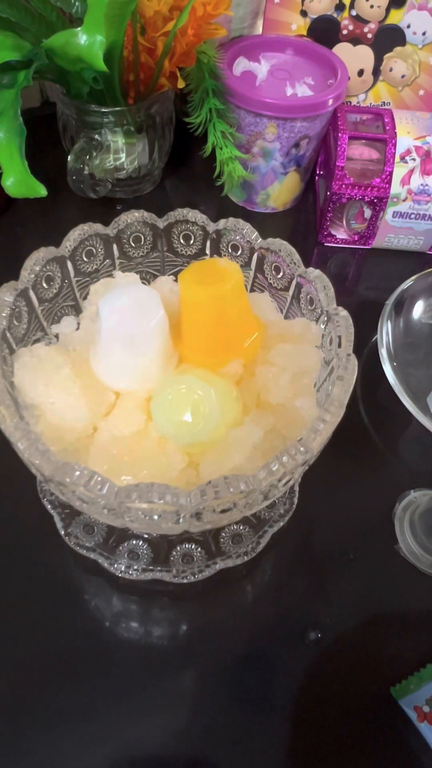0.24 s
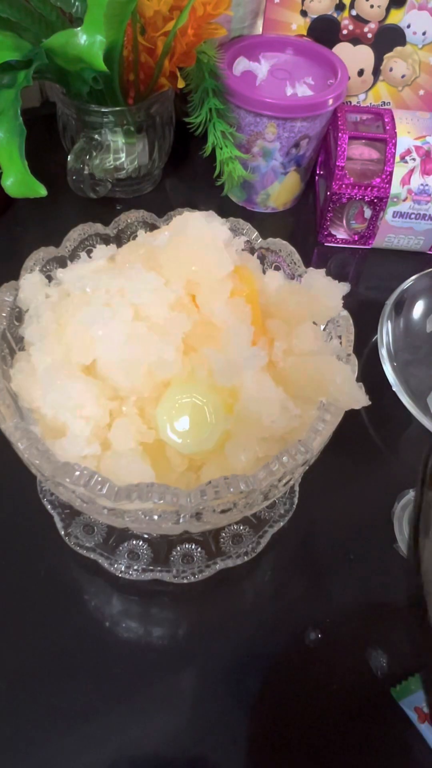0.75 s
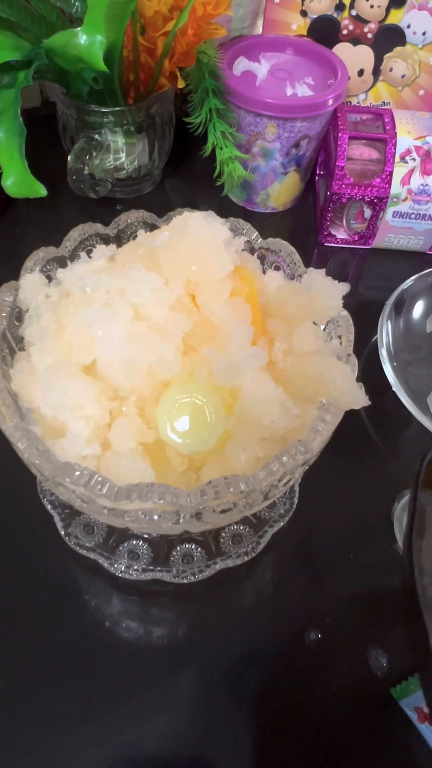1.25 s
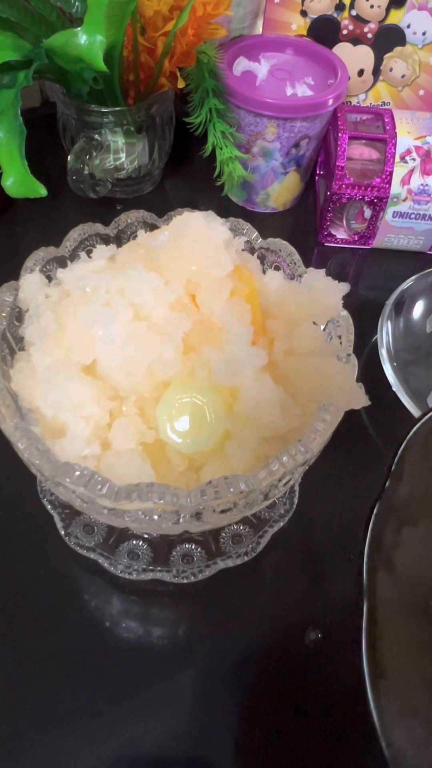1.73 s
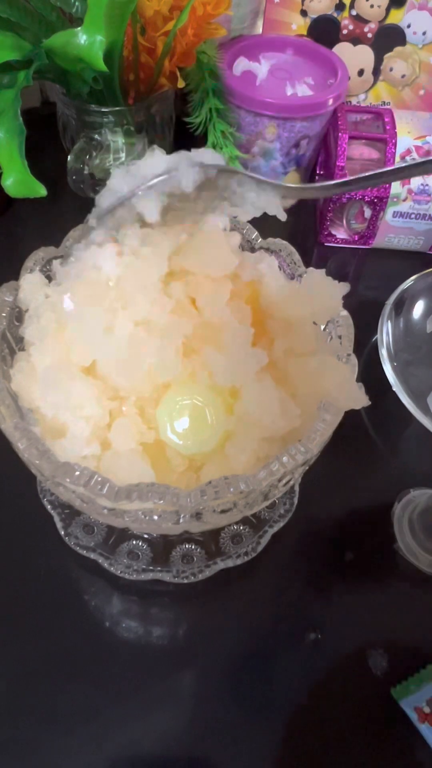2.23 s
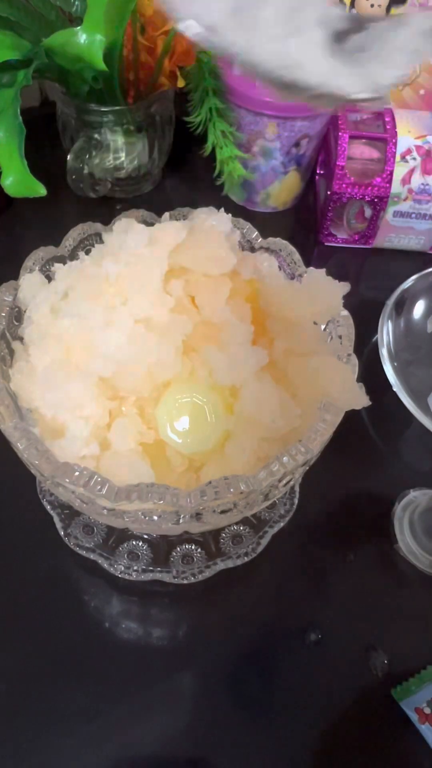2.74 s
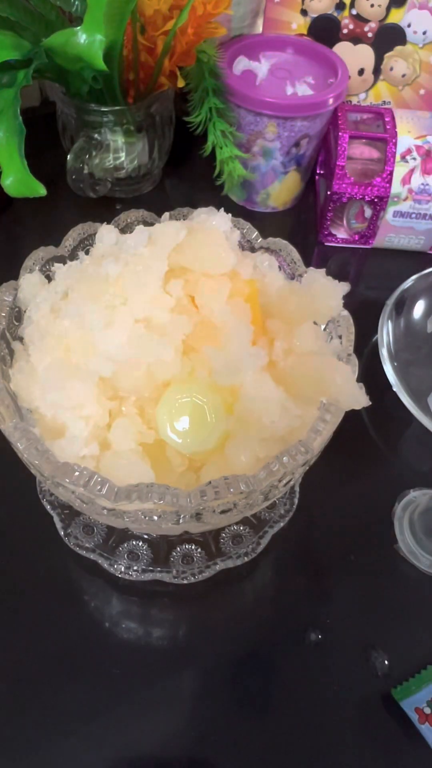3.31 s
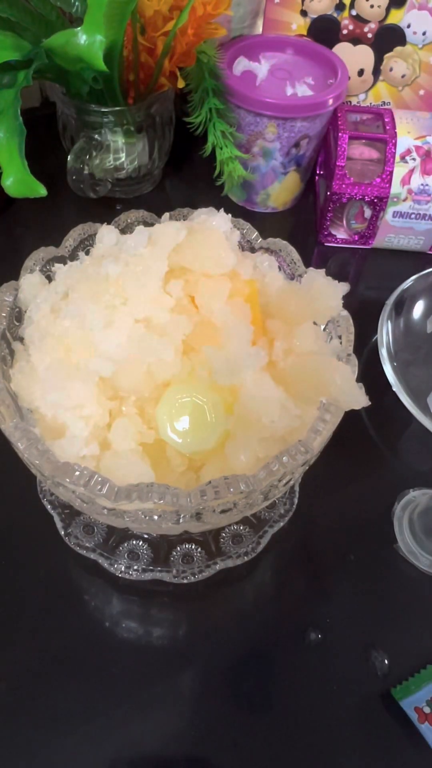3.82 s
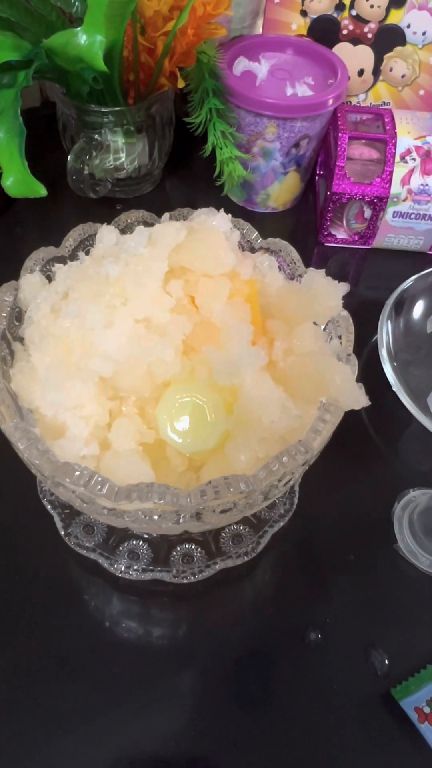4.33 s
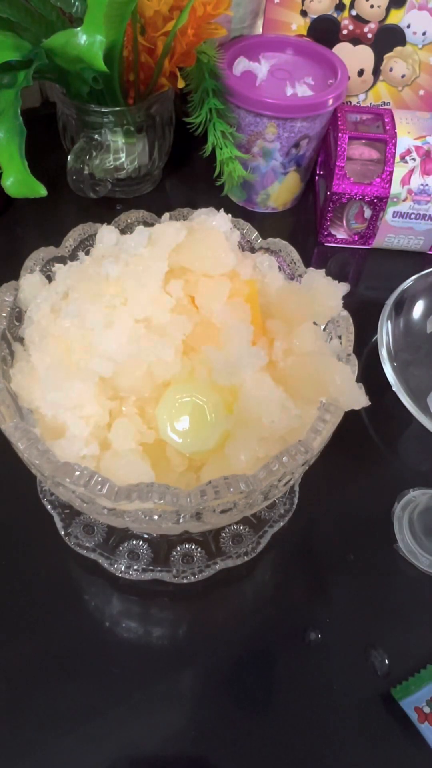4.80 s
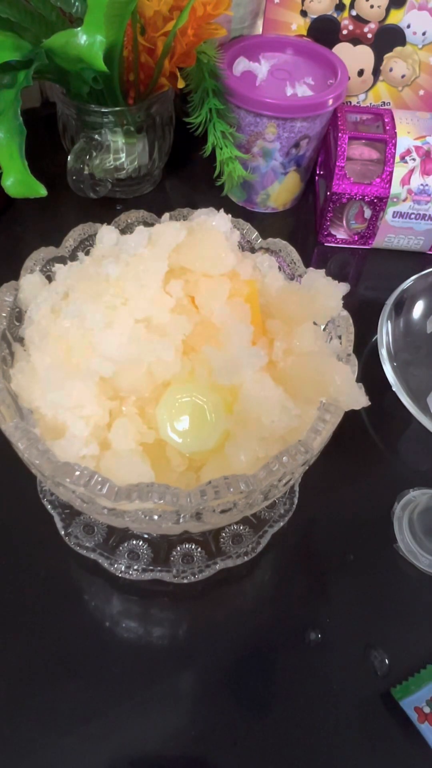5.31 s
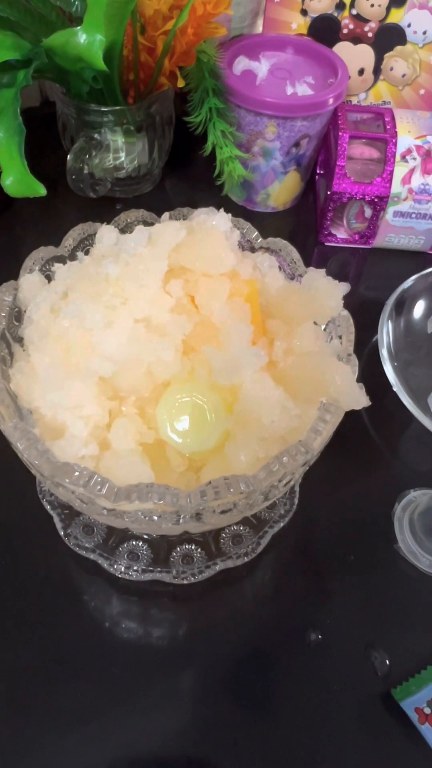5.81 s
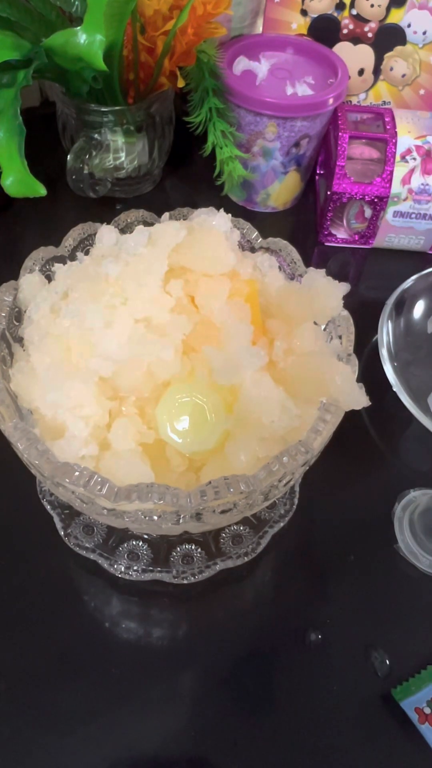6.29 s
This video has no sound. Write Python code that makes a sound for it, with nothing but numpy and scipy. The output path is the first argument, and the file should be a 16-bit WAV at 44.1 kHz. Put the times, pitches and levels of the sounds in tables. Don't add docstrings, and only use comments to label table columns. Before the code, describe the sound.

Close up in a small hard kitchen, ice gives brief bright crunches, a tiny gap, then a loud spoon bite with sharp cracks and glass clinks. Grains skitter and it goes quiet. Softer slushy slides and light metallic scrapes follow, then a plastic tub further off is knocked and thuds hollowly. A faint fridge hum and room air run underneath.

```python
import sys
import numpy as np
from scipy import signal
from scipy.fft import rfft, irfft, next_fast_len
from scipy.io import wavfile
from scipy.ndimage import uniform_filter1d

SR = 44100
rng = np.random.default_rng(int(sys.argv[2]) if len(sys.argv) > 2 else 0)


def field_ratio(decibels):
    return 10 ** (np.asarray(decibels, dtype=float) / 20)


def store_pcm(level_fs):
    pcm = np.round(np.clip(level_fs, -1, 1) * 32767).astype(np.int16)
    wavfile.write(sys.argv[1], SR, np.atleast_2d(pcm).T)


N = 288855
SCENE_CHANGE_S = 0.343


def rms_one(x):
    return x / np.sqrt(np.mean(x ** 2) + 1e-20)


def at_hz(points, hz):
    table_hz, values = np.transpose(points)
    return np.interp(np.log(hz), np.log(table_hz), values)


def band(x, low_hz, high_hz):
    return signal.sosfilt(signal.butter(2, [low_hz, high_hz], "band", fs=SR, output="sos"), x)


def high_pass(x, order, hz):
    return signal.sosfilt(signal.butter(order, hz, "high", fs=SR, output="sos"), x)


def drift(rate_hz):
    steps = rng.standard_normal(int(N / SR * 60) + 2)
    r = np.exp(-2 * np.pi * rate_hz / 60)
    wander = rms_one(signal.lfilter([1], [1, -r], steps))
    return np.interp(np.arange(N) * 60 / SR, np.arange(len(steps)), wander)


def ring(x, hz, t60_s):
    r, w = field_ratio(-60 / (t60_s * SR)), 2 * np.pi * hz / SR
    return signal.lfilter([0, np.sin(w)], [1, -2 * r * np.cos(w), r * r], x + 1e-18)


def spread(mid, side, alike):
    alike = np.clip(alike, -1, 1)
    return np.sqrt((1 + alike) / 2) * mid + np.sqrt((1 - alike) / 2) * side * [[1], [-1]]


def through_bands(x, bands, spans):
    size, share, t = next_fast_len(N + 4096), np.zeros(N), np.arange(N) / SR
    hz = np.arange(size // 2 + 1) * SR / size + 1
    response = 0
    for centre_hz, width_hz, db in bands:
        response = response + field_ratio(db) / (1 + 1j * (hz - centre_hz ** 2 / hz) / width_hz) ** 2
    for start_s, end_s, part in spans:
        share[(t >= start_s) & (t < end_s)] = part
    share = uniform_filter1d(share, size=100)
    resonant = irfft(rfft(x, size) * response, size)[:, :N]
    return share * resonant + (1 - share) * x


# start [s], rise [s], hold [s], level near 3 kHz [dB],
# brightness near 7 kHz [dB].
CRUSHES = [(0.0, 0.00097, .001, -57, -3.5), (.088, 0.0019, 0.0018, -46, 4.5),
           (.232, 0.0044, 0.0014, -43.5, 5.5), (.352, 0.0069, .002, -69.5, 2),
           (.595, 0.0035, 0.016, -53.5, 1), (.64, 0.0024, 0.0018, -38, -9.5),
           (.68, 0.014, 0.035, -48.5, -4), (.742, .003, 0.13, -58, 2.5), (.885, 0.0058, 0.046, -49, 0.5),
           (.94, 0.016, 0.04, -57, 0), (1.015, 0.0027, 0.087, -62.5, -7), (1.185, 0.027, 0.008, -73.5, 2),
           (1.215, 0.03, 0.16, -68.5, 8), (2.003, 0.004, 0.021, -68, 8), (2.055, 0.02, 0.0059, -58.5, 7),
           (2.81, 0.0083, 0.0019, -85, 3), (3.026, 0.0046, 0.0053, -65.5, 9.5),
           (3.14, 0.026, .003, -56.5, -4.5), (3.175, 0.002, 0.032, -47, 4.5),
           (4.41, 0.013, 0.017, -61, -0.5), (5.42, 0.019, 0.039, -53.5, -3.5),
           (5.613, 0.0046, 0.04, -56.5, -4)]
# start [s], rise [s], hold [s], level near 3 kHz [dB],
# brightness near 7 kHz [dB].
SLIDES = [(.75, 0.065, 0.038, -36.5, -14), (1.012, 0.0034, 0.0017, -55, -16),
          (2.278, 0.064, 0.006, -44.5, -7.5), (2.395, 0.0017, .002, -73, 12.5),
          (2.665, 0.01, 0.0013, -58.5, -14.5), (2.865, 0.078, 0.016, -44.5, -14.5),
          (3.07, 0.024, 0.068, -77, -14), (3.28, 0.0034, .002, -56, 2), (3.437, 0.0016, 0.0016, -50, 2.5),
          (3.545, 0.016, 0.027, -50, -8.5), (3.732, 0.005, 0.0025, -53, 3.5),
          (3.955, 0.02, 0.0024, -58, -10), (4.03, 0.04, 0.15, -58, -1.5), (4.123, 0.002, 0.0087, -41, -17),
          (4.25, 0.084, 0.14, -64.5, -9.5), (4.472, 0.0024, 0.046, -55, -9), (4.6, 0.046, 0.015, -57, -11),
          (4.668, 0.0025, 0.0045, -45, -18.5), (4.75, 0.029, 0.068, -66.5, -12),
          (5.082, 0.0036, 0.0023, -41.5, -37.5), (5.357, 0.0024, 0.023, -41, -9)]
# start [s], rise [s], hold [s], level near 3 kHz [dB],
# brightness near 7 kHz [dB].
SETTLES = [
    (2.665, 0.0053, 0.018, -72.5, -20.5),
    (3.06, 0.0024, 0.0015, -75, -18),
    (5.205, 0.026, .001, -56, 1.5),
    (5.224, 0.0043, .001, -36.5, -15),
    (5.625, 0.03, 0.005, -49.5, -17),
    (5.651, 0.0025, 0.0027, -47.5, -28),
]
FALL_SHARES = [.9, 1.011, 1.05, 1.201]


def strokes():
    t, power = np.arange(0, N / SR + .01, .001), 1e-12
    # level near 1 kHz re 3 kHz [dB], rise depth [dB], fall [dB/s], level near 13 kHz [dB]
    kinds = ((CRUSHES, -12, 8.5, 208.5, -3.5),
             (SLIDES, -11, 19.5, 158, -11),
             (SETTLES, 14, 12.5, 153, -11))
    for rows, low_db, rise_db, fall_db_s, top_db in kinds:
        for s, rise_s, hold_s, db, bright_db in rows:
            rise_s = max(rise_s, .001)
            colour_db = db + np.array([[low_db], [0], [bright_db], [top_db + 1.2 * bright_db]])
            lead_in_db = -45 * np.maximum(s - t, 0) / rise_s
            attack_db = -rise_db * np.clip(1 - (t - s) / rise_s, 0, 1)
            after_s = np.maximum(t - s - rise_s - hold_s, 0)
            shape_db = attack_db + lead_in_db - fall_db_s * np.outer(FALL_SHARES, after_s)
            heard = (t < SCENE_CHANGE_S) == (s < SCENE_CHANGE_S)
            power = power + heard * field_ratio(colour_db + shape_db) ** 2
    return t, 10 * np.log10(power)


def grains(per_s, spread_db):
    heights = field_ratio(spread_db * np.minimum(rng.exponential(1, (4, N)), 5))
    signs = rng.choice([-1, 1], (4, N))
    return rms_one(heights * signs * (rng.random((4, N)) < per_s / SR))


COLOUR_HZ = [1000, 3000, 7000, 13000]
# frequency [Hz], likeness [-1 to 1].
SLUSH_LIKENESS = [(500, 0.17), (2000, 0.073), (5000, 0.18), (14000, 0.19)]


def slush():
    s, levels_db = strokes()
    levels_db = levels_db - 10 * np.log10([[900], [2500], [4500], [5500]])
    edges_hz = 350 * 2 ** np.arange(0, 5.7, .5)
    clicks, out, t = grains(per_s=3000, spread_db=2.0), 0, np.arange(N) / SR
    thin_db_per_octave = np.where(np.arange(N) < 1.6 * SR, 24, 1.5)
    for k, (low_hz, high_hz) in enumerate(zip(edges_hz, edges_hz[1:])):
        hz = np.sqrt(low_hz * high_hz)
        place = np.interp(np.log(hz), np.log(COLOUR_HZ), range(4))
        level_db = np.maximum(1 - np.abs(place - np.arange(4)), 0) @ levels_db
        fall_db = -thin_db_per_octave * max(0, np.log2(800 / hz))
        patchy_db = 2.5 * drift(4.9)
        gain = field_ratio(np.interp(t, s, level_db) + fall_db + patchy_db)
        mid, side = band(clicks[k % 2::2], low_hz, high_hz) * np.sqrt(SR / 2)
        out = out + gain * spread(mid, side, at_hz(SLUSH_LIKENESS, hz))
    return out


# from [s], to [s], share [0-1].
ON_SPOON = [
    (3.175, 3.277, .55),
    (3.278, 3.43, .9),
    (3.435, 3.55, .9),
    (3.733, 3.9, .93),
]
# centre [Hz], width [Hz], level [dB].
SPOON_BANDS = [(1070, 1240, 0.5), (2050, 400, 3.5), (2600, 200, 3), (3190, 700, 6), (4320, 550, 2),
               (5690, 260, 6), (7800, 800, 1), (8650, 300, 0), (9300, 500, 6), (11050, 650, 5.5),
               (12950, 650, 5), (15000, 400, -2)]
# from [s], to [s], share [0-1].
ON_EDGE = [
    (1.25, 1.295, .3),
    (1.296, 1.39, .6),
    (1.39, 1.44, .25),
]
# centre [Hz], width [Hz], level [dB].
EDGE_BANDS = [(1700, 1500, 1), (3000, 500, 9), (4170, 700, 3), (5860, 560, 8), (7400, 600, 11),
              (9200, 1200, 4), (11000, 1500, 1), (12700, 900, 5), (14700, 1500, 4)]
# from [s], to [s], share [0-1].
ON_GLASS = [
    (.64, .735, .3),
    (.74, .876, .48),
    (.9, 1.0, .15),
    (1.012, 1.21, .25),
    (4.125, 4.15, .6),
]
# centre [Hz], width [Hz], level [dB].
BOWL_BANDS = [(1000, 290, 2), (1990, 490, 7.5), (2470, 540, 12), (3130, 590, 4.5), (4500, 1000, 10),
              (5680, 120, 4), (7200, 800, 1), (9000, 4500, -3), (11070, 27000, 6.5), (14750, 670, -1)]
# from [s], to [s], share [0-1].
IN_TUB = [
    (5.22, 5.355, .65),
    (5.65, 5.9, .55),
]
# centre [Hz], width [Hz], level [dB].
TUB_BANDS = [(420, 110, -10), (720, 100, 2), (860, 130, 3), (1110, 220, 11), (1380, 320, 9), (1805, 270, 3),
             (2200, 300, 7), (2900, 1200, 4), (4200, 2200, 1), (9600, 7400, 2.5)]
# from [s], to [s], share [0-1].
ON_RIM = [
    (5.356, 5.41, .55),
    (5.41, 5.44, .35),
    (5.44, 5.56, .08),
]
# centre [Hz], width [Hz], level [dB].
RIM_BANDS = [(1460, 6000, -7.5), (3330, 450, 10), (4430, 340, 12), (5950, 480, 11), (7200, 630, 8),
             (9500, 2600, 2.5), (11600, 1200, 5), (14000, 2400, 4)]


def ice_on_objects():
    ice = slush()
    for bands, spans in ((SPOON_BANDS, ON_SPOON), (EDGE_BANDS, ON_EDGE), (BOWL_BANDS, ON_GLASS),
                         (TUB_BANDS, IN_TUB), (RIM_BANDS, ON_RIM)):
        ice = through_bands(ice, bands, spans)
    return ice


TUB_LAG_SAMPLES = -22
# from [s], to [s].
AT_TUB = [
    (2.6, 3.15),
    (4.6, 6.55),
]


def from_tub(ice):
    t, there = np.arange(N) / SR, np.zeros(N)
    for start_s, end_s in AT_TUB:
        there[(t >= start_s) & (t < end_s)] = 1
    alike = 0.19 * uniform_filter1d(there, size=400)
    left = alike * np.roll(ice[1], TUB_LAG_SAMPLES) + np.sqrt(1 - alike ** 2) * ice[0]
    return np.array([left, ice[1]])


# start [s], peak [dB], relative level below 1.5 kHz [dB],
# relative level above 7 kHz [dB].
CRACKS = [(0.0925, -30.5, -7, 8), (0.1267, -40, -8, -6), (0.234, -28.5, -13, -12), (0.2495, -24, -12, -7),
          (0.3619, -51, -27, -18), (0.4814, -62, -11, 6), (0.52, -61, -18, 11), (0.5477, -58, -12, -10),
          (0.596, -29, -20, 7.5), (0.6359, -8, -11, 5), (0.6409, -16.5, -9, -10),
          (0.7368, -3.5, -11.5, -2.5), (0.8813, -12.5, -12.5, 1), (0.8892, -22, 0.5, 0),
          (0.8954, -21.5, -10, 5), (1.0102, -20, -18, -3), (1.2505, -49, 2, -18), (1.2943, -38, -4.5, -28),
          (1.355, -49, -2, -15), (1.4341, -64, -22.5, 0.5), (2.008, -48.5, -22, -3.5),
          (2.3954, -30.5, -26, 4), (2.399, -28, -21.5, -7), (2.404, -43, -18, 1), (2.4274, -61, -6.5, -15),
          (2.667, -53, -11.5, 8), (2.6745, -49.5, -6.5, 4), (2.987, -54, -11, 9), (3.063, -56, 0, -15),
          (4.068, -51, -19, -3), (4.129, -42, -5.5, 5), (5.8364, -52, -24, -24)]


def cracks():
    out, t = np.zeros((2, N)), np.arange(3000) / SR
    pan = field_ratio([[-1.75], [1.75]])
    for s, peak_db, low_db, high_db in CRACKS:
        noise = rng.standard_normal((2, len(t)))
        burst = noise * field_ratio(-60 * t / .022) * np.minimum(t / .0008, 1)
        burst[:, 30:33] += [[7, -3, -6], [2, 2, -3]]
        low = band(band(burst, 760, 1800), 760, 1800)
        middle, high = band(burst, 1500, 7000), band(burst, 7000, 19000)
        sound = 0
        for colour, db in ((low, low_db), (middle, 0), (high, high_db)):
            sound = sound + colour / np.abs(colour).max() * field_ratio(db)
        i = round(s * SR)
        out[:, i:i + len(t)] += field_ratio(peak_db + 3) * spread(*sound, .85) * pan
    lag_samples = 0.75
    turn = np.exp(-2j * np.pi * lag_samples * np.arange(N // 2 + 1) / N)
    out = np.array([irfft(rfft(out[0]) * turn, N), out[1]])
    return through_bands(out, BOWL_BANDS, [(.7, 1.1, 0.32)])


def struck(blows, modes, alike, lag_samples):
    out, t = np.zeros((2, N)), np.arange(SR // 2) / SR
    for s, peak_db, rattle_s, pan_db in blows:
        rise = np.minimum(t / (0.065 * rattle_s + 0.00012), 1)
        rattle = rng.standard_normal((2, len(t))) * field_ratio(-60 * t / rattle_s) * rise
        sound = 0
        for hz, db, ring_s in modes:
            mode = ring(rattle, hz, ring_s)
            own_db = 2 * rng.standard_normal()
            sound = sound + field_ratio(db + own_db) * mode / np.abs(mode).max(axis=1, keepdims=True)
        left, right = spread(*sound, alike) / np.abs(sound).max() * field_ratio(peak_db + 6.5)
        i = round(s * SR)
        out[0, i + lag_samples:i + lag_samples + len(t)] += left * field_ratio(pan_db / 2)
        out[1, i:i + len(t)] += right * field_ratio(-pan_db / 2)
    return out


# start [s], peak [dB], rattle t60 [s], left-right [dB].
DIG_BLOWS = [
    (.6362, -13, .012, 0.5),
]
# frequency [Hz], level [dB], t60 [s].
DIG_MODES = [(470, -12, .04), (860, -9, .045), (1110, -4, .025), (1270, -7, .021), (1740, -8, .02),
             (2650, 0, .02), (4760, -10, .025), (5680, -11, .04), (7190, -4, .02), (7870, 0, .02),
             (9510, -2, .015), (11300, 0, .025), (12750, -5, .02), (15000, -8, .02)]
# start [s], peak [dB], rattle t60 [s], left-right [dB].
GLASS_BLOWS = [
    (.7374, -15, 0.0084, 0),
    (.8812, -17, 0.01, -1.5),
    (.8893, -27, 0.0085, -1),
    (.8962, -31.5, .008, -7),
    (1.0105, -23.5, 0.0088, 1.5),
]
# frequency [Hz], level [dB], t60 [s].
GLASS_MODES = [(1050, -6.5, 0.018), (1880, -6, 0.025), (2360, 0, 0.029), (2790, -2, 0.013),
               (3300, -8, 0.014), (4500, -8, 0.022), (4642, -8, 0.025), (7680, -3, .02), (7960, 3, 0.014),
               (8980, -2, .015), (9500, -7, .015), (11340, -9, .012), (13000, -12.5, .012),
               (14595, -13, .012)]
# start [s], peak [dB], rattle t60 [s], left-right [dB].
RIM_BLOWS = [
    (3.1735, -27, 0.02, 2),
    (3.209, -43, 0.027, -1),
]
# frequency [Hz], level [dB], t60 [s].
RIM_MODES = [(1026, -9.5, 0.02), (1780, -5, 0.029), (2686, 0.5, 0.047), (3020, -14, .033),
             (4280, -7, 0.037), (4800, -8, .04), (5710, -9, .04), (7950, -5, 0.019), (9250, -5.5, 0.023),
             (11070, -1.5, 0.018), (12800, -10, .02), (14900, -4, .015)]
# start [s], peak [dB], rattle t60 [s], left-right [dB].
CLINKS = [
    (3.278, -38, 0.014, 0),
    (5.358, -43.5, .06, 0),
]
# frequency [Hz], level [dB], t60 [s].
SPOON_MODES = [(2120, -22, 0.018), (3227, -7, 0.036), (3590, -5, 0.017), (4240, -10, 0.012),
               (5790, -7.5, 0.034), (7570, -14, 0.018), (7900, -14, .02), (8660, -10, 0.024),
               (9200, -12.5, 0.031), (11130, -14, .02), (12800, -15, 0.015), (14600, -19, .02)]
# start [s], peak [dB], rattle t60 [s], left-right [dB].
TIP_CLINKS = [
    (3.437, -39, 0.015, -2),
    (3.444, -47.5, 0.024, 1),
]
# frequency [Hz], level [dB], t60 [s].
TIP_MODES = [(2135, -3, 0.027), (3080, 2, 0.064), (3340, -9, .05), (4300, -9, .04), (5790, 3, 0.044),
             (7750, -1, 0.043), (8500, -14, .03), (9240, -13, .04), (11300, -16, .03), (12900, -5, .03),
             (14800, -16, .015)]
# start [s], peak [dB], rattle t60 [s], left-right [dB].
HEEL_CLINKS = [
    (3.734, -46.5, 0.033, 0),
    (3.745, -47, 0.042, 1),
]
# frequency [Hz], level [dB], t60 [s].
HEEL_MODES = [(2037, -5.5, 0.054), (3090, -5, 0.066), (3470, -4.5, .04), (4600, -18, .03),
              (5620, -1.5, 0.14), (8000, -11, .04), (9260, -5, .05), (11000, -16, .02), (12900, -2, .05)]


def spoon_blows():
    out = np.zeros((2, N))
    for blows, modes, alike, low_hz in ((DIG_BLOWS, DIG_MODES, .85, 470),
                                        (GLASS_BLOWS, GLASS_MODES, .85, 750),
                                        (RIM_BLOWS, RIM_MODES, .6, 400),
                                        (CLINKS, SPOON_MODES, .4, 1400),
                                        (TIP_CLINKS, TIP_MODES, .5, 1400),
                                        (HEEL_CLINKS, HEEL_MODES, .5, 1400)):
        out = out + high_pass(struck(blows, modes, alike, lag_samples=1), 4, low_hz)
    return out


# start [s], peak [dB], rattle t60 [s], left-right [dB].
KNOCKS = [
    (.095, -46, 0.083, 2),
    (.25, -42.5, 0.022, 1.5),
    (.636, -39.5, 0.026, 0),
    (2.427, -56, 0.023, 1),
    (4.472, -42.5, 0.16, 1),
    (4.674, -37.5, 0.093, -1.5),
    (5.084, -46, 0.22, 0),
    (5.224, -29.5, 0.16, 3),
    (5.651, -34, 0.154, 3),
]
# frequency [Hz], level [dB], t60 [s].
TUB_MODES = [(217.7, -28.5, 0.065), (343.3, -31.5, 0.15), (430, -15.5, 0.098), (503, -22.5, 0.073),
             (707, -2.5, 0.016), (917, -3, 0.049), (1052, 2, 0.019), (1370, -7.5, 0.0061),
             (1830, 1, 0.0048), (2300, 2, 0.012), (4320, -17.5, 0.015)]
# start [s], peak [dB], rattle t60 [s], left-right [dB].
THUDS = [
    (5.224, -14.5, .05, 6),
    (5.276, -25, .03, 6),
    (5.652, -27, 0.05, 9),
]
# frequency [Hz], level [dB], t60 [s].
TUB_WALL_MODES = [(210, -18, 0.13), (415, -14, .08), (507, -19, .08), (710, -11, .08), (850, -7, .06),
                  (930, -9, .08), (1091, 1, 0.2), (1160, -2, .1), (1310, -3, 0.06), (1430, -1, .03),
                  (1570, -12, 0.044), (2190, -8, .06), (2700, -15, 0.04)]


def tub_blows():
    knocks = struck(KNOCKS, TUB_MODES, alike=0.27, lag_samples=TUB_LAG_SAMPLES)
    return knocks + struck(THUDS, TUB_WALL_MODES, alike=0.84, lag_samples=TUB_LAG_SAMPLES)


# start [s], peak [dB], centre [Hz], t60 [s].
TAPS = [(.742, -31, 2500, .12), (.926, -39, 6600, .02), (1.0105, -29, 1010, .018), (1.013, -44, 2550, .24),
        (1.2505, -45, 1050, .02), (1.251, -51, 2800, .02), (1.2515, -49, 7300, .03),
        (1.252, -54, 9500, .02), (1.295, -45, 1700, .025), (1.2955, -46, 5900, .044),
        (1.296, -50, 7500, .03), (1.309, -48, 7400, .043), (1.322, -53, 7300, .03),
        (1.328, -52, 12700, .05), (1.352, -50.5, 1500, .02), (1.355, -51, 7500, .025),
        (1.356, -54, 5800, .02), (1.426, -56, 9000, .015), (1.434, -52, 6000, .015),
        (1.529, -60, 5995, .014), (1.561, -60, 428, .28), (1.77, -54.5, 540, .17), (2.422, -45, 480, .03),
        (2.68, -54, 600, .05), (2.82, -60, 6500, .02), (2.821, -62, 9200, .02), (2.987, -50, 11500, .015),
        (3.062, -37, 850, .022), (3.966, -53.5, 4200, .11), (4.063, -50, 4200, .07),
        (4.185, -44, 1050, .05), (4.475, -47, 1420, .16), (4.671, -44.5, 4700, .054),
        (4.673, -37, 3200, .057), (4.674, -38.5, 560, .082), (5.085, -43, 2800, .052),
        (5.215, -31, 1300, .06), (5.44, -39, 210, .065), (5.455, -51, 210, .04), (5.691, -39, 510, .19)]


def taps():
    out, t = np.zeros((2, N + SR // 4)), np.arange(SR // 4) / SR
    for s, peak_db, hz, t60_s in TAPS:
        width = 1 + np.clip(.02 / t60_s, .08, 1) * min(1, 1500 / hz)
        envelope = field_ratio(-60 * t / t60_s) * np.minimum(t / (.1 * t60_s), 1)
        noise = rng.standard_normal((2, len(t)))
        puff = band(noise * envelope, hz / width, min(hz * width, 19000))
        i = round(s * SR)
        out[:, i:i + len(t)] += field_ratio(peak_db) * spread(*puff, 0.87) / np.abs(puff).max()
    return out[:, :N]


# frequency [Hz], t60 [s].
KITCHEN_T60 = [(200, .6), (1000, .4), (4000, .33), (14000, .18)]


def kitchen(x):
    size = next_fast_len(N + SR)
    hz = np.maximum(np.arange(size // 2 + 1) * SR / size, 1)
    t60_s = at_hz(KITCHEN_T60, hz)
    spectrum, out = rfft(x.mean(axis=0), size), []
    for lags_s in rng.uniform(.009, 0.034, (2, 10)):
        response = 0
        for k, lag_s in enumerate(lags_s):
            one_round = field_ratio(-60 * lag_s / t60_s) * np.exp(-2j * np.pi * hz * lag_s)
            response = response + (-1) ** k * one_round / (1 - one_round)
        out.append(irfft(spectrum * response, size)[:N])
    return np.array(out)


# time [s], level of its 100 Hz line [dB].
MOTOR_LOAD = [
    (0.0, -63.5),
    (0.44, -57),
    (1.81, -63),
    (2.44, -56.5),
    (3.359, -64),
    (3.54, -54.5),
    (3.96, -64),
    (5.31, -57.5),
    (6.09, -69),
    (6.55, -55),
]
MOTOR_HZ = [49.5, 100.3, 146.8]
# centre [Hz], width [Hz], level [dB rms].
HUM = [(204.2, 12, -64), (293.7, 8.2, -72), (415, 34, -72)]


def fridge():
    t = np.arange(N) / SR
    s, load_db = np.transpose(MOTOR_LOAD)
    levels_db = [-70.5 + 2.5 * drift(2.5),
                 np.interp(t, s, load_db) + 2.5 * drift(6),
                 -61 + 3 * drift(5)]
    hum = 0
    for hz, db in zip(MOTOR_HZ, levels_db):
        phase = 2 * np.pi * np.cumsum(hz * (1 + .015 * drift(3.4))) / SR
        hum = hum + np.sqrt(2) * field_ratio(db) * np.sin(phase)
    for hz, width_hz, db in HUM:
        cabinet = rms_one(ring(rng.standard_normal(N + SR), hz, 2.2 / width_hz))
        hum = hum + field_ratio(db) * cabinet[SR:]
    return hum


# frequency [Hz], level [dB per Hz].
AIR = [(24, -36), (40, -11), (151, -10.5), (269, -17.5), (770, -20.5), (1180, -30), (4460, -40.5),
       (16000, -58.5)]
# frequency [Hz], depth [dB].
AIR_PATCHY = [(150, .5), (400, 3), (900, 3), (3000, 1.2), (12000, 1)]
# frequency [Hz], likeness [-1 to 1].
AIR_LIKENESS = [(60, 0.99), (130, 0.5), (200, 0.92), (300, 0.55), (600, -0.59), (5000, -0.12)]


def room_air():
    edges_hz = 35 * 2 ** np.arange(0, 9.1, .5)
    white, air = rng.standard_normal((2, 2, N + 4096)), 0
    for k, (low_hz, high_hz) in enumerate(zip(edges_hz, edges_hz[1:])):
        hz = np.sqrt(low_hz * high_hz)
        mid, side = band(white[k % 2], low_hz, high_hz)[:, 4096:]
        gain = field_ratio(at_hz(AIR, hz) + at_hz(AIR_PATCHY, hz) * drift(6.0))
        air = air + gain * spread(mid, side, at_hz(AIR_LIKENESS, hz))
    return field_ratio(-60) * rms_one(air)


def scene():
    near = cracks() + spoon_blows()
    far = tub_blows()
    room = kitchen(field_ratio(-20.5) * near + field_ratio(-10.5) * far)
    left, right = near + far + room + from_tub(ice_on_objects()) + taps()
    mid = high_pass(left + right, 4, 150) / 2
    side = high_pass(left - right, 2, 332.6) / 2
    return np.array([mid + side, mid - side]) + fridge() + room_air()


def roll_off(x):
    return signal.sosfilt(signal.butter(12, 17130, fs=SR, output="sos"), x)


def record(dry):
    dip_width_s, top_hz = .005, 15900
    dip = 1 - .9 * np.exp(-((np.arange(N) / SR - SCENE_CHANGE_S) / dip_width_s) ** 2)
    top_cut = signal.cheby2(10, 30, top_hz * 1.03, fs=SR, output="sos")
    mix = signal.sosfilt(top_cut, dry * dip)
    return roll_off(mix)


dry = scene()
out = record(dry)
store_pcm(out)
```